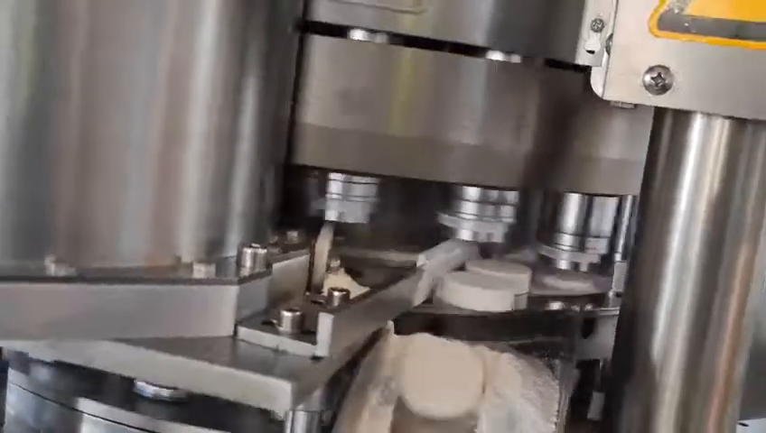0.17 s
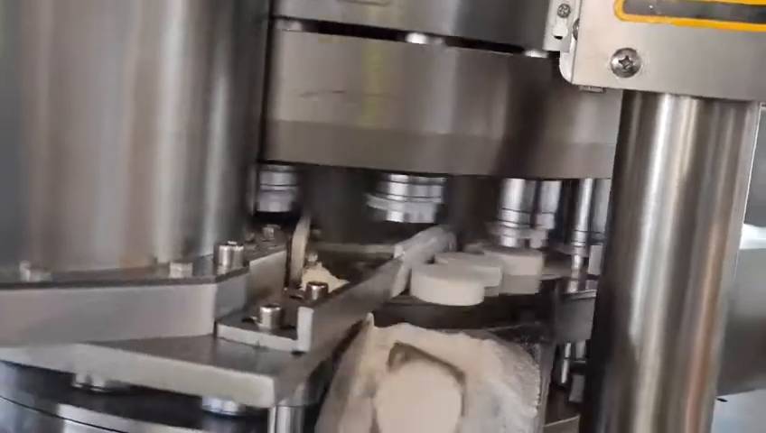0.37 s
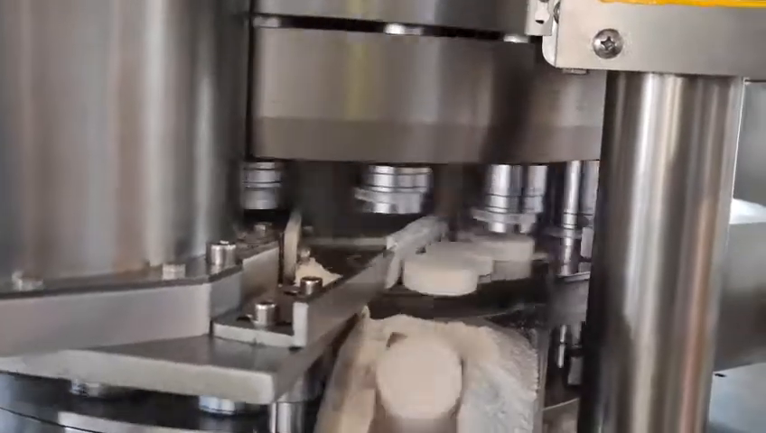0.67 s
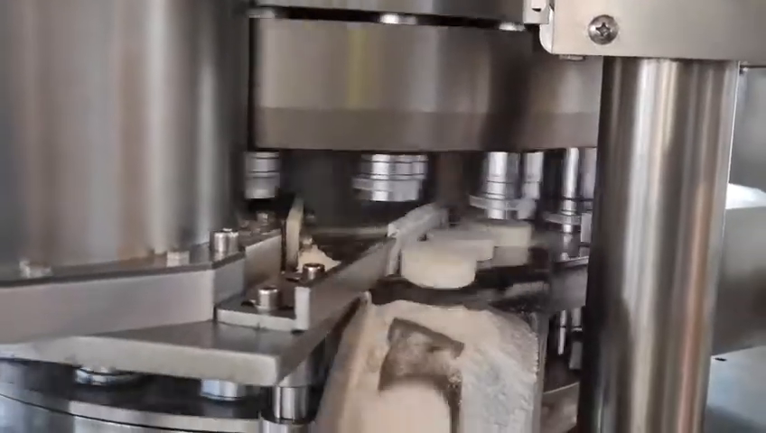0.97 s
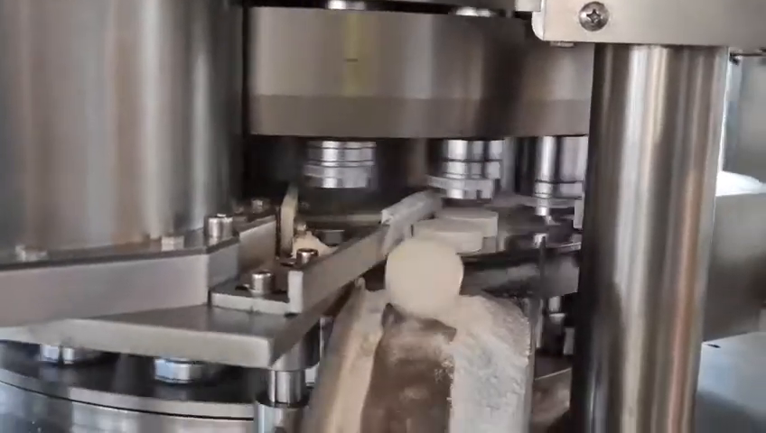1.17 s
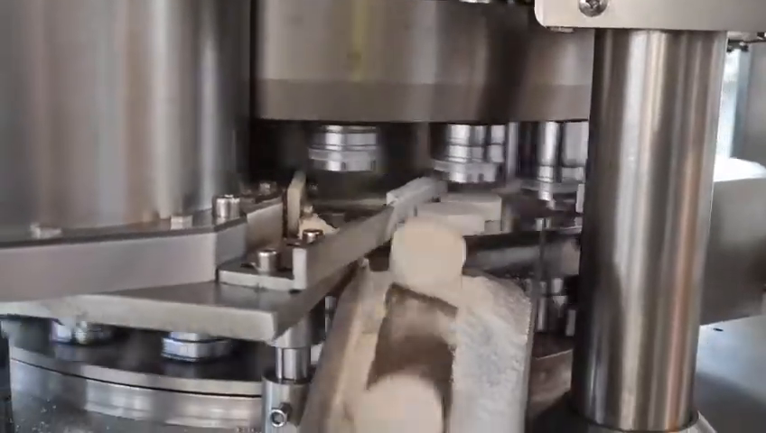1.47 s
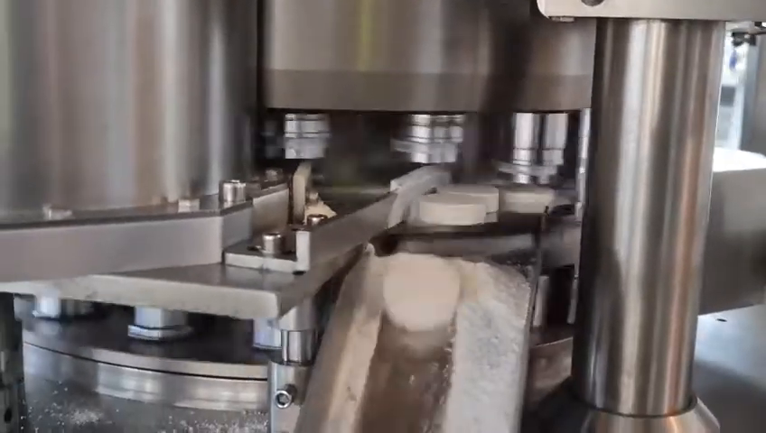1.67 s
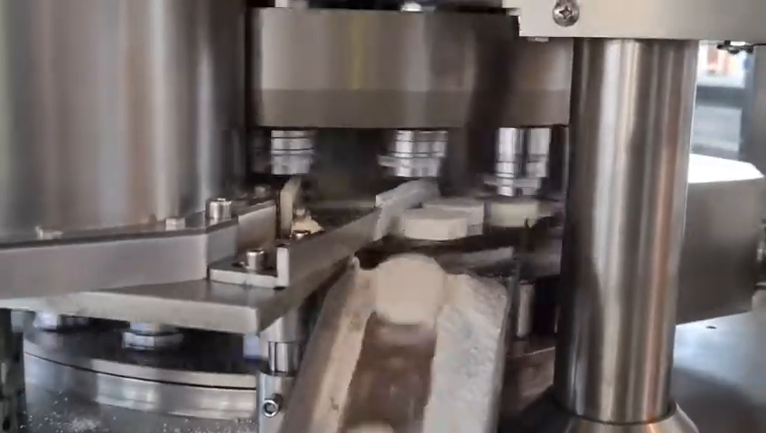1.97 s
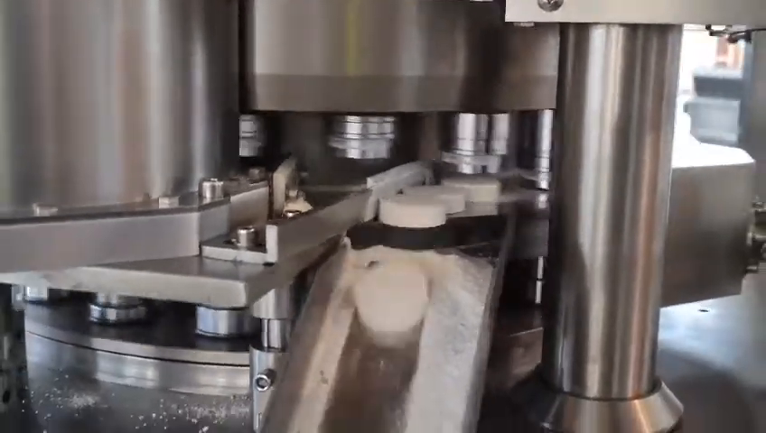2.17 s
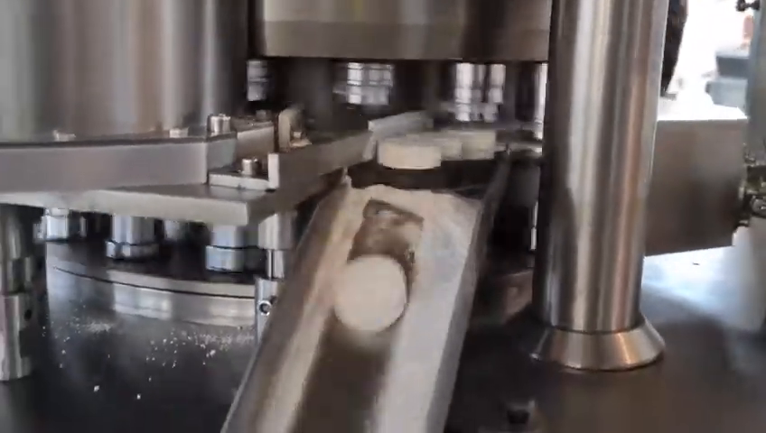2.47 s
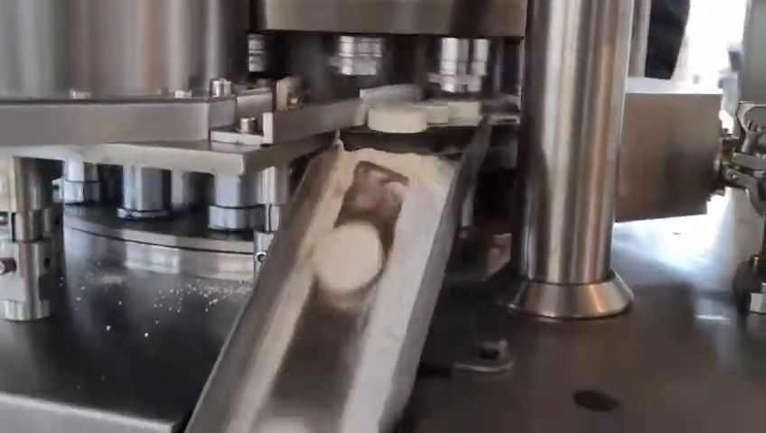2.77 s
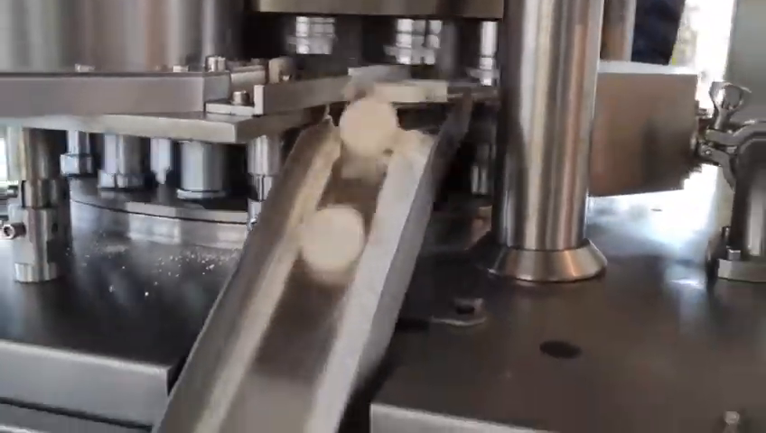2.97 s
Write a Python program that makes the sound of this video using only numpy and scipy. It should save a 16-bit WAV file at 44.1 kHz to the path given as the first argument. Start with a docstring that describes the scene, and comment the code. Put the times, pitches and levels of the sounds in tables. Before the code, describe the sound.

Tablet press running close by: quick metallic clanks, dense clicking and scraping, constant rattling drive roar

```python
"""A rotary tablet press runs steadily in a workshop, heard from close beside its turret.
Punches clank under the pressure roller nearly seven times a second: shaped noise and struck steel modes.
They click and scrape in their cams about three times as often, as noise, sharp ticks and high pings.
Tablets clack into the chute, the housing thumps, a bump sounds low and a high hiss comes in two spells.
Beneath, the drive roars and rattles as noise through narrow resonances."""
import sys
import numpy as np
from scipy import signal
from scipy.fft import rfft, irfft, next_fast_len
from scipy.io import wavfile
from scipy.ndimage import uniform_filter1d

SR = 44100
rng = np.random.default_rng(int(sys.argv[2]) if len(sys.argv) > 2 else 0)


def put_to_file(sound):
    """Save the sound as 16-bit audio at rate SR, in the file named by the first command-line argument."""
    columns = np.atleast_2d(sound).T  # one column per channel
    safe = np.clip(columns, -1, 1)
    whole_steps = np.round(safe * 32767)
    wavfile.write(sys.argv[1], SR, whole_steps.astype(np.int16))


N = 138033  # length in samples

# Punches under the roller. Each row: start in seconds, then relative levels of ring, body and frame in dB.
CLANKS = [(0.244, -13, -23, -15.5), (0.394, -16, -16.5, -24), (0.55, -10, -15.5, -20),
          (0.695, -8.5, -18, -13.5), (0.8447, -7.5, -16.5, -15.5), (.982, -8, -33, -14.5),
          (1.128, -7.5, -18.5, -18), (1.295, -7.5, -13.5, -19), (1.433, -9, -19, -16),
          (1.579, -12.5, -16.5, -14.5), (1.736, -9.5, -17.5, -12.5), (1.871, -9, -32, -11),
          (2.0251, -9.5, -15.5, -13.5), (2.183, -8.5, -24.5, -15.5), (2.331, -8.5, -17.5, -16),
          (2.473, -8.5, -15, -19), (2.624, -12, -31, -16.5), (2.769, -8.5, -17.5, -21.5),
          (2.906, -8.5, -16, -29), (3.058, -8, -28, -21)]
# Punches knocking in the cams. Each row: start in seconds, relative levels of treble and middle in dB,
# scrape length in seconds.
CLICKS = [(0.147, -19, -11.5, 0.0074), (0.213, -11, -6, 0.0041), (.252, -17, -13, 0.01),
          (0.296, -16.5, -10.5, 0.0066), (0.351, -10, -3.5, 0.011), (.446, -18, -8.5, .012),
          (0.46, -14, -8, 0.036), (0.509, -6.5, -7.5, 0.0062), (0.59, -34, -10, 0.012),
          (0.631, -17, -7.5, 0.014), (0.656, -8.5, -6, 0.017), (0.695, -4.5, -3, .003),
          (0.736, -15, -10, 0.015), (0.792, -11.5, -10, 0.027), (0.882, -14.5, -11.5, 0.018),
          (0.945, -15, -8, 0.014), (.957, -8.5, -6.5, .007), (1.034, -18, -12, 0.035),
          (1.083, -19, -13, 0.022), (1.103, -8, -5.5, 0.0069), (1.134, -12.5, -33, 0.0054),
          (1.18, -14, -11.5, 0.011), (1.23, -10, -9, 0.0094), (1.251, -10, -7, 0.0067),
          (1.329, -9, -9, 0.0068), (1.377, -10, -10.5, 0.0099), (1.396, -10, -8.5, 0.0077),
          (1.427, -15.5, -34, 0.014), (1.48, -13.5, -11, 0.0094), (1.507, -14, -14.5, 0.039),
          (1.537, -15, -7.5, 0.026), (1.625, -13, -11.5, 0.023), (1.658, -13, -8.5, 0.027),
          (1.691, -12, -9, 0.017), (1.77, -12.5, -12, 0.018), (1.802, -15, -9, 0.019),
          (1.841, -10.5, -6, 0.012), (1.856, -11.5, -12, 0.027), (1.92, -11, -11, 0.008),
          (1.968, -14.5, -10, 0.014), (1.988, -11.5, -5.5, 0.0081), (2.071, -15.5, -15, 0.022),
          (2.119, -15.5, -12.5, 0.016), (2.139, -8, -6.5, 0.0081), (2.179, -9.5, -19, 0.003),
          (2.217, -16, -13, 0.017), (2.261, -16, -9, 0.0065), (2.284, -9, -11, 0.0098),
          (2.368, -15, -12, .014), (2.398, -6, -8.5, 0.011), (2.413, -10.5, -11, 0.03),
          (2.435, -15, -9, 0.034), (2.515, -19, -13.5, 0.015), (2.545, -18.5, -13, 0.025),
          (2.577, -12, -8, 0.0088), (2.621, -12, -11.5, 0.0075), (2.665, -20, -14.5, 0.022),
          (2.713, -15, -10, 0.0094), (2.731, -7.5, -5.5, 0.0071), (2.77, -10.5, -13, 0.0031),
          (2.817, -17, -11, .01), (2.846, -17, -11, 0.025), (2.87, -12, -10.5, 0.032),
          (2.959, -18, -23, 0.016), (2.993, -21, -13, 0.01), (3.019, -10.5, -4.5, 0.021),
          (3.093, -20.5, -14.5, 0.031)]
CLICK_RISE_S = 0.00079


def undb(db):
    """Level as the logarithm of amplitude: decibels become gain."""
    return 10 ** (np.asarray(db) / 20)


def along(points, hz):
    """Interpolation on a logarithmic frequency axis, the axis of pitch."""
    p = np.array(points, float)
    return np.interp(np.log(hz + 1), np.log(p[:, 0]), p[:, 1])


def colour(x, spectrum, peaks=()):
    """Minimum-phase filtering: a causal response of unit power with the given spectrum and resonances."""
    size = 2 * next_fast_len(N)
    hz = np.arange(size // 2 + 1) * SR / size
    gain = undb(along(spectrum, hz))
    for centre, width, db in peaks:
        bell = 1 / (1 + (2 * (hz - centre) / width) ** 2)
        gain = gain * np.sqrt(1 + (undb(db) ** 2 - 1) * bell)
    # folding the cepstrum onto positive time makes the response causal
    cepstrum = irfft(np.log(gain / np.sqrt(np.mean(gain ** 2))))
    cepstrum[1:size // 2] *= 2
    cepstrum[size // 2 + 1:] = 0
    response = np.exp(rfft(cepstrum))
    return irfft(rfft(x, size) * response)[..., :N]


def noise():
    """Incoherence: three unrelated noises, for the direct path and the reflections at each port."""
    return rng.standard_normal((3, N))


def walk(rate):
    """Slow random modulation: smoothed random steps, rate per second, with a spread of 1."""
    k = max(int(SR / rate), 2)
    steps = np.repeat(rng.standard_normal(N)[:N // k + 1], k)
    w = uniform_filter1d(steps, k)[:N]
    return w / w.std()


def decay(t, t60):
    """Exponential damping: amplitude falls 60 dB in t60 seconds."""
    return np.exp(-np.log(1000) * t / t60)


def blows(rows, rise, t60):
    """Energy summation of blows (s, dB, hold s): each rises quickly, holds and rings down."""
    power, t = np.zeros(N), np.arange(SR // 4) / SR
    for start, db, hold in rows:
        i = int(np.clip(start * SR, 0, N - 1))
        shape = undb(db) * np.minimum(t / rise, 1) * decay(np.maximum(t - hold, 0), t60)
        power[i:i + len(t)] += shape[:N - i] ** 2
    return np.sqrt(power)


def struck(rows, modes, rise, scatter_db, detune):
    """Modal synthesis: each blow (s, dB) shares its force among damped modes a little differently."""
    out, t = np.zeros((3, N)), np.arange(SR // 4) / SR
    attack = np.minimum(t / rise, 1)
    for start, db in rows:
        i = int(start * SR)
        for hz, mode_db, t60 in modes:
            size, shift = rng.standard_normal(2)
            # the direct path starts at zero phase, the reflections at random phases
            phase = np.append(0, rng.uniform(0, 2 * np.pi, 2))[:, None]
            ring = np.sin(2 * np.pi * hz * (1 + detune * shift) * t + phase) * decay(t, t60)
            level = undb(db + mode_db + scatter_db * size)
            out[:, i:i + len(t)] += (level * attack * ring)[:, :N - i]
    return out


def drive(waver_db=0.7):
    """Forced resonance: the gears roar through the frame while loose parts rattle at random."""
    # Each row: frequency in Hz, width in Hz, peak height in dB.
    resonances = [(110.4, 9.1, 7), (302, 15, 4.5), (393.4, 17, 7.5), (548.7, 8.6, 7), (650, 11.7, 11.5),
                  (791, 49, 9), (885, 35, 8), (1092, 6.6, 13), (1220, 37, 3), (1847, 31, 8), (4100, 14, 9)]
    # Spectra of roar and rattle. Each row: frequency in Hz, relative level in dB per Hz.
    roar_spectrum = [(20, -7), (48, -3), (72, -2.5), (105, -3), (200, 1), (420, -1.5), (950, -7.5),
                     (1500, -2.5), (2400, -2.5), (4000, -12), (8000, -19.5), (10000, -31), (16000, -35)]
    rattle_spectrum = [(60, -4), (300, -6), (800, -6), (1500, -11.5), (2500, -1), (4000, -10.5),
                       (8000, -20), (10000, -39), (16000, -28)]
    roar_db, rattle_db = -21, -27.5
    rattles_per_s, rattle_t60_s, rattle_scatter_db = 90, 0.041, 6

    roar = colour(noise() * undb(waver_db * walk(29.89)), roar_spectrum, resonances)
    # one knock per time slot, at a random moment and with a random level
    chance = rng.uniform(0, .95, (int(rattles_per_s * N / SR), 2))
    knocks = []
    for slot, (when, size) in enumerate(chance):
        knocks.append(((slot + when) / rattles_per_s, -rattle_scatter_db * np.log(1 - size), 0))
    envelope = blows(knocks, 0.0011, rattle_t60_s)
    envelope = envelope / np.sqrt(np.mean(envelope ** 2))
    rattle = colour(envelope * noise(), rattle_spectrum, resonances)
    return undb(roar_db) * roar + undb(rattle_db) * rattle


def ticks(envelope):
    """Impulsive excitation: sharp, separate contacts of random size that follow an envelope."""
    ticks_per_s = 1200
    size = rng.standard_normal((3, N)) * (rng.random((3, N)) < ticks_per_s / SR)
    return envelope * size * np.sqrt(SR / ticks_per_s)


def clicks(grain_db=2, grain_rate=450):
    """Impact and friction: punches knock the cams and scrape on in tiny catches and sharp ticks."""
    # Spectra of treble and middle. Each row: frequency in Hz, relative level in dB per Hz.
    treble_spectrum = [(500, -52), (2500, -3), (4000, 5), (6000, 2.5), (8300, 0.5), (9600, -13.5),
                       (12000, -7.5), (13800, -14), (15500, -21)]
    middle_spectrum = [(100, -37.5), (300, 4), (800, -4), (1200, 2.5), (1550, 0), (2400, 4.5), (3300, 1),
                       (5000, -19), (11000, -22), (16000, -28)]
    # Resonances of the cam track. Each row: frequency in Hz, width in Hz, peak height in dB.
    cam = [(2900, 52, 7), (3540, 58, 5.5), (4120, 44, 9), (5060, 110, 7), (6570, 65, 4), (8100, 180, 5.5)]
    treble_db, middle_db = -11, -9.5
    treble_t60_s, middle_t60_s = 0.038, 0.1
    tick_share = 0.38  # of the treble's power

    catches = undb(grain_db * walk(grain_rate))
    treble = blows([(s, db, hold) for s, db, _, hold in CLICKS], CLICK_RISE_S, treble_t60_s)
    middle = blows([(s, db, hold) for s, _, db, hold in CLICKS], CLICK_RISE_S, middle_t60_s)
    scrape = treble * catches * noise()
    contact = np.sqrt(1 - tick_share) * scrape + np.sqrt(tick_share) * ticks(treble)
    return (undb(treble_db) * colour(contact, treble_spectrum, cam)
            + undb(middle_db) * colour(middle * catches * noise(), middle_spectrum))


def pings(count=6):
    """Free vibration: each knocking punch rings a few high modes, different every time."""
    low_hz, high_hz, t60_s, ping_db = 1854, 7900, 0.044, -24.5
    out, t = np.zeros((3, N)), np.arange(SR // 12) / SR
    shape = np.minimum(t / CLICK_RISE_S, 1) * decay(t, t60_s)
    for start, db, _, _ in CLICKS:
        i = int(start * SR)
        # one mode at random in each of equal logarithmic bands
        position = (np.arange(count) + rng.random(count)) / count
        hz = low_hz * (high_hz / low_hz) ** position
        cycles = hz[:, None] * t + rng.random((3, count, 1))
        ring = np.sin(2 * np.pi * cycles).sum(axis=1)
        out[:, i:i + len(t)] += (undb(db + ping_db) * shape * ring)[:, :N - i]
    return out


def bump():
    """Damped low-frequency noise: one soft, very low bump as the sound comes in."""
    # Each row: start in seconds, level in dB, hold in seconds.
    bump_rows = [(.148, -17, 0.011)]
    # Each row: frequency in Hz, relative level in dB per Hz.
    bump_spectrum = [(12, -2), (24, -8), (50, -30), (140, -21), (500, -58)]
    return blows(bump_rows, 0.0032, t60=0.24) * colour(noise(), bump_spectrum)


def slack():
    """Amplitude modulation: the drive quietens as the load builds before each clank."""
    depth_db, lead_s, width_s = -2.5, 0.011, .011
    t = np.arange(N) / SR
    dips = sum(np.exp(-((t - s + lead_s) / width_s) ** 2) for s, _, _, _ in CLANKS)
    return undb(depth_db * dips)


def cracks():
    """Hard impact: a brief, sharp first contact of punch on roller opens each clank."""
    # Each row: frequency in Hz, relative level in dB per Hz.
    crack_spectrum = [(150, -12), (500, 5), (1300, -8), (2300, -7), (3500, -5), (8000, -17), (16000, -29)]
    crack_db, hold_s, t60_s = -15, 0.002, 0.023
    contact = blows([(s, db, hold_s) for s, db, _, _ in CLANKS], 0.00023, t60_s)
    return undb(crack_db) * colour(contact * noise(), crack_spectrum)


def clanks(chatter_db=1.0, chatter_rate=400):
    """Modal excitation by impact: a dense steel ring, a duller body and modes of roller and frame."""
    # Modes of roller and punch, then frame. Each row: frequency in Hz, relative level in dB, t60 in seconds.
    roller_modes = [(1192, -7, .13), (1390, -11, .09), (1789, -4, .12), (1899, -2, .13), (2036, -7, .08),
                    (2134, -7, .08), (2293, -7, .09), (2424, -7, .08), (2475, -7, .08), (2698, -6, .08),
                    (2959, -8, .09), (4114, -14, .12)]
    frame_modes = [(363.3, -7.5, 0.087), (390.5, -3, 0.18), (438.3, 1.5, 0.085), (539, -14, 0.085),
                   (660, -8, 0.13), (759, -8, 0.13), (845, -5.5, 0.14)]
    # Spectra of ring and body. Each row: frequency in Hz, relative level in dB per Hz.
    ring_spectrum = [(200, -60), (800, -5), (1450, -18.5), (1900, 9), (2800, -1), (3600, -8.5),
                     (7500, -19.5), (10000, -34), (16000, -34)]
    body_spectrum = [(60, -26), (200, -8), (420, -3), (560, -2), (820, -8), (1300, -4.5), (3000, -29),
                     (16000, -83)]
    ring_db, body_db, roller_db, frame_db = -8.5, -2.5, -6, 1
    ring_t60_s, body_t60_s = 0.12, 0.067
    hold_s, rise_s = 0.0072, 0.003

    ring = blows([(s, db, hold_s) for s, db, _, _ in CLANKS], rise_s, ring_t60_s)
    body = blows([(s, db, hold_s) for s, _, db, _ in CLANKS], rise_s, body_t60_s)
    roller = struck([(s, db) for s, db, _, _ in CLANKS], roller_modes,
                    rise=0.00065, scatter_db=0.0, detune=0.0058)
    frame = struck([(s, db) for s, _, _, db in CLANKS], frame_modes,
                   rise=0.0074, scatter_db=1.9, detune=0.011)
    chattering = ring * undb(chatter_db * walk(chatter_rate)) * noise()
    return (undb(ring_db) * colour(chattering, ring_spectrum)
            + undb(body_db) * colour(body * noise(), body_spectrum)
            + undb(roller_db) * roller + undb(frame_db) * frame)


def tablets():
    """Damped impact: tablets tip off the turret and land in the steel chute with a dull clack."""
    # Each row: start in seconds, relative level in dB.
    drops = [(0.468, 1), (0.771, -6), (1.090, -7), (1.397, -0.5), (1.804, -2.5), (2.145, -11), (2.551, 0.5),
             (3.002, -2.5)]
    # Each row: frequency in Hz, relative level in dB per Hz.
    clack_spectrum = [(200, -17.5), (550, -8.5), (770, 1.5), (950, -8.5), (1080, -7), (1250, 2.5),
                      (1600, -28), (4000, -14), (16000, -45)]
    clack_db, hold_s, t60_s = -17, 0.013, 0.12
    landings = blows([(s, db, hold_s) for s, db in drops], 0.0053, t60_s)
    return undb(clack_db) * colour(landings * noise(), clack_spectrum)


def thumps():
    """Low modal vibration: soft, hollow knocks in the housing, each with its own pitch ratio."""
    # Each row: start in seconds, relative level in dB, ratio applied to the mode frequencies.
    thump_rows = [(0.597, 0, 0.98), (1.392, -9.5, 0.88), (1.694, -9, 1.44), (2.222, -4.5, 1.05),
                  (3.064, -7, 1)]
    # Modes of the housing. Each row: frequency in Hz at ratio 1, relative level in dB, t60 in seconds.
    housing = [(265.5, 0, 0.11), (299, 1.5, 0.24), (387, -0.5, 0.16)]
    thump_db = -10
    out = 0
    for start, db, ratio in thump_rows:
        modes = [(hz * ratio, mode_db, t60) for hz, mode_db, t60 in housing]
        out = out + struck([(start, db)], modes, rise=.011, scatter_db=1, detune=.012)
    return undb(thump_db) * out


def hiss(waver_db=1, waver_rate=60):
    """Modulated broadband noise: a thin, unsteady hiss comes in two spells high above the clatter."""
    # Each row: time in seconds, relative level in dB.
    hiss_level = [(.69, -50), (.73, 1), (.8, 3.5), (.86, 0), (.95, 1), (1.0, -50), (1.44, -50), (1.485, 1),
                  (1.535, 8), (1.59, 0), (1.68, 1.5), (1.84, -6), (1.93, -50)]
    # Each row: frequency in Hz, relative level in dB per Hz.
    hiss_spectrum = [(3000, -18), (8000, -7), (10000, -17), (11700, -6.5), (13600, -12), (15000, 1),
                     (15500, 3), (16200, -9)]
    hiss_db = -34
    spells_db = np.interp(np.arange(N) / SR, *np.array(hiss_level).T)
    db = hiss_db + spells_db + waver_db * walk(waver_rate)
    return colour(undb(db) * noise(), hiss_spectrum)


def scene():
    """Interaural-style delay and decorrelation: direct sound leads at the left, reflections differ."""
    # Share of direct sound at the two microphone ports.
    # Each row: frequency in Hz, share of power (limited to 0-1 below).
    direct = [(25, 2.7), (70, 0.3), (140, 2.5), (300, 0.83), (700, 1.35), (1400, 1.35), (3000, -0.31),
              (12000, 0.57)]
    # Balance of the ports. Each row: frequency in Hz, left minus right in dB.
    left_db = [(60, -1), (110, 0.5), (200, -2.5), (380, 1.5), (700, -2), (1290, 0.5), (2380, 2),
               (4400, -4.5), (8120, -4.5), (15000, 1)]
    # Balance shifts as the microphone moves. Each row: time in seconds, left minus right in dB.
    sway = [(.2, 5), (.6, 0), (1.0, 1.3), (1.35, -1.1), (1.75, 0), (2.3, 0.7), (3.0, -0.5)]
    port_lag_s = .00017

    machine = slack() * drive() + clicks() + pings() + bump() + cracks() + clanks()
    paths = rfft(machine + tablets() + thumps() + hiss(), 2 * next_fast_len(N))
    hz = np.linspace(0, SR / 2, paths.shape[1])
    share = np.clip(along(direct, hz), 0, 1)
    sides = np.array([[1], [-1]])  # left, right
    lag = np.exp(1j * np.pi * hz * port_lag_s * sides)  # half the lag on each side
    ports = np.sqrt(share) * paths[0] * lag + np.sqrt(1 - share) * paths[1:]
    balanced = irfft(ports * undb(sides * along(left_db, hz) / 2))[:, :N]
    sway_db = np.interp(np.arange(N) / SR, *np.array(sway).T)
    return balanced * undb(sides * sway_db / 2)


def record(dry):
    """Soft saturation and band limiting: the sound fades in, peaks are rounded and the top is cut."""
    # Each row: time in seconds, gain in dB.
    fade_in = [(0, -101), (0.132, -64), (0.146, -5.5), (.25, -1), (.45, 1.5)]
    ceiling = 0.89  # the loudest peaks are rounded towards this amplitude
    top_hz = 15550
    faded = dry * undb(np.interp(np.arange(N) / SR, *np.array(fade_in).T))
    rounded = faded / (1 + (faded / ceiling) ** 6) ** (1 / 6)
    low_pass = signal.ellip(10, .2, 80, top_hz, fs=SR, output="sos")
    return signal.sosfilt(low_pass, rounded)


dry = scene()
out = record(dry)
put_to_file(out)
```